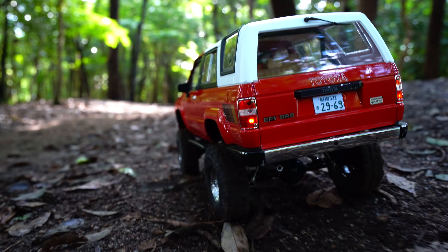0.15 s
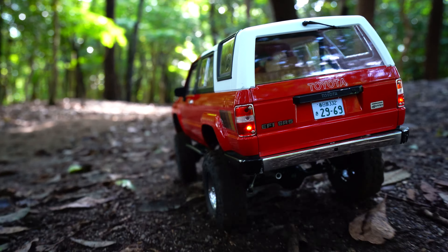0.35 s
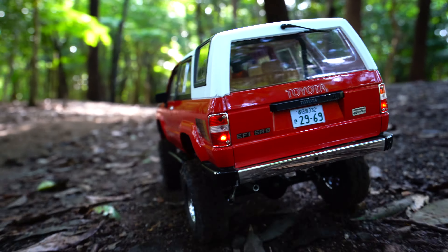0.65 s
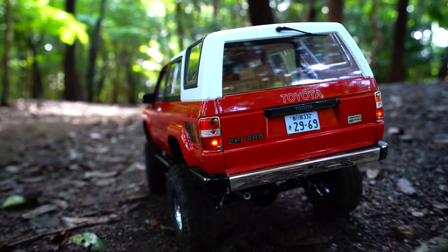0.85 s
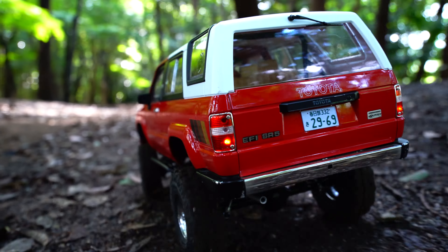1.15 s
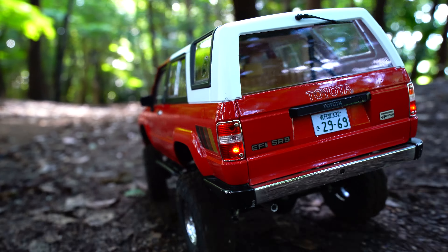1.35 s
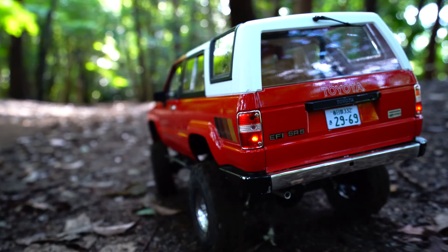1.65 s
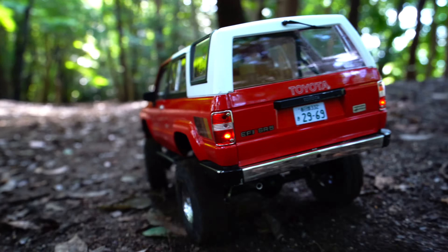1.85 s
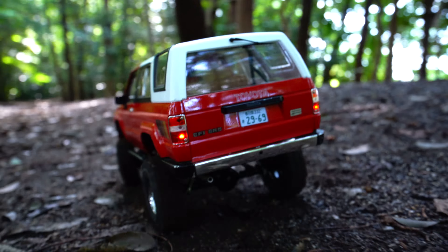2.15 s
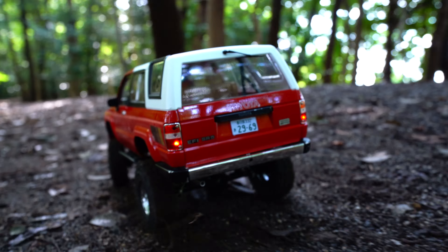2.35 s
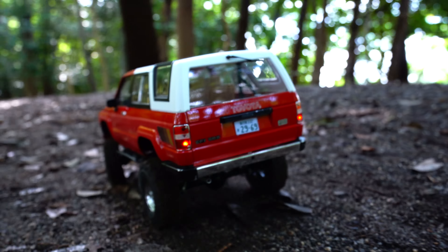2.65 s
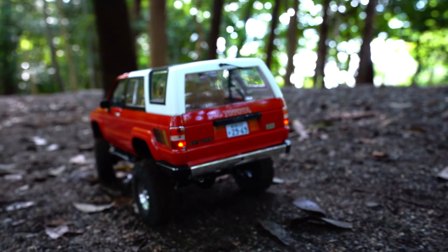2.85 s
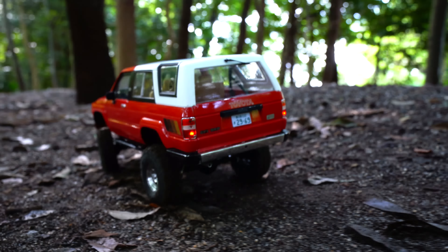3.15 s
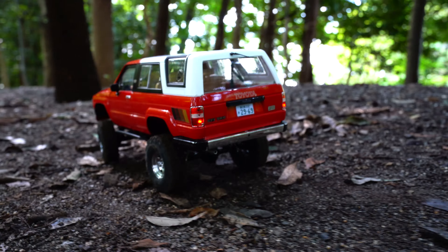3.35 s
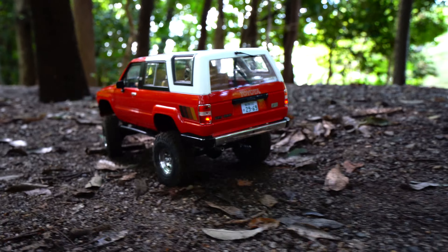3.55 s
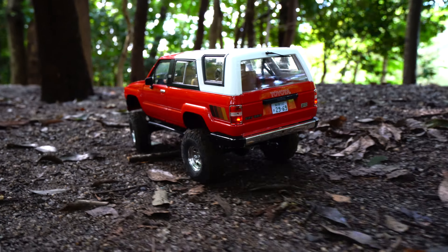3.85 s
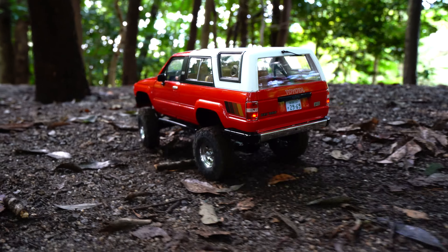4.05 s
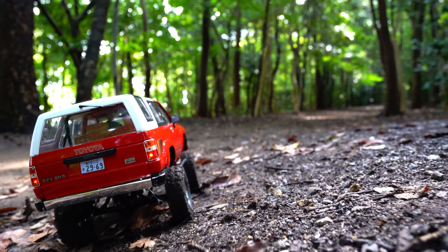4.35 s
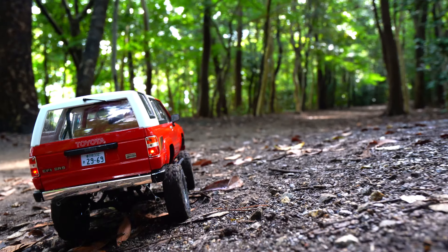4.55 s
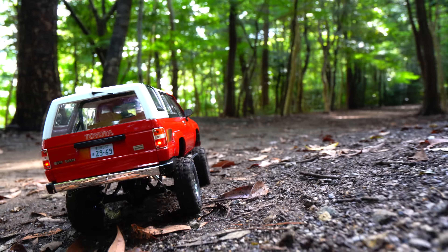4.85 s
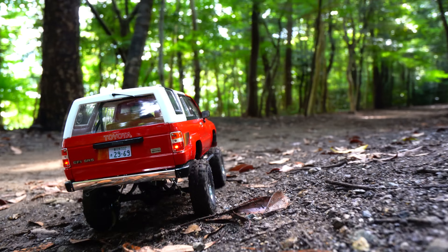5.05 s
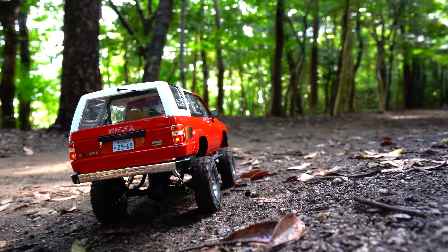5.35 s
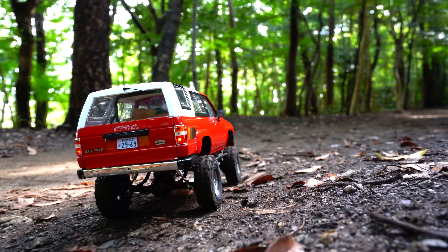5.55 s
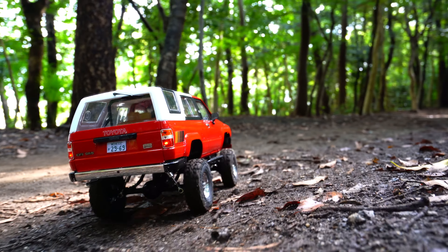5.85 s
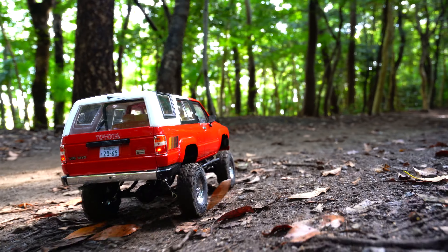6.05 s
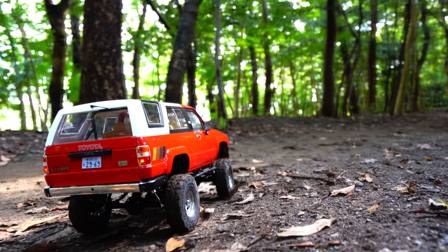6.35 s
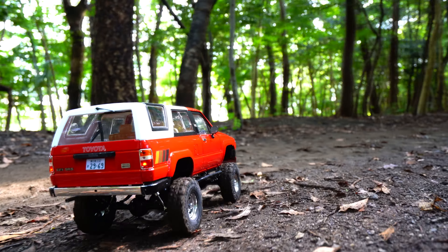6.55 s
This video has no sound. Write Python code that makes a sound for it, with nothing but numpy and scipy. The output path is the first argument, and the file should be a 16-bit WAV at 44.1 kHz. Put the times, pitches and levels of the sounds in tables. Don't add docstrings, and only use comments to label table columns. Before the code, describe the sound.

A radio-controlled model truck crawls across soil and leaf litter, its nasal motor whine wobbling, lurching and briefly dropping out. Soft tyres rumble and thump over roots; dull little knocks hit the body. A quick scene change makes the truck more distant, with renewed surges later. Bright, high insect noise dominates throughout, with occasional faint nearer insects, captured by one outdoor microphone, essentially mono.

```python
import sys
import numpy as np
from scipy import signal
from scipy.fft import rfft, irfft
from scipy.io import wavfile
from scipy.ndimage import uniform_filter1d

SR = 44100
rng = np.random.default_rng(int(sys.argv[2]) if len(sys.argv) > 2 else 0)


def elevation(decibels):
    levels = np.asarray(decibels, float)
    return 10 ** (levels / 20)


def store_wav(level_fs):
    pcm = np.round(np.clip(np.atleast_2d(level_fs), -1, 1) * 32767)
    wavfile.write(sys.argv[1], SR, pcm.T.astype(np.int16))


N = 295029
CUT_S = 4.287


def evened(x):
    return x / np.sqrt(np.mean(x ** 2) + 1e-20)


def columns(rows):
    s, *values = np.transpose(rows)
    return [np.interp(np.arange(N) / SR, s, v) for v in values]


def humps(s, length_s, height):
    out = np.zeros(N)
    for at_s, span_s, top in np.broadcast(s, length_s, height):
        first = max(round((at_s - span_s / 2) * SR), 0)
        last = min(round((at_s + span_s / 2) * SR), N)
        part = np.arange(first, last)
        out[part] += top * np.cos(np.pi * (part / SR - at_s) / span_s) ** 2
    return out


def drift(top_hz, count=N):
    return evened(signal.lfilter(*signal.butter(2, top_hz, fs=SR), rng.standard_normal(count)))


def noise(shape, patchy_db, size=512, tilt_db=np.zeros(N)):
    hop = size // 4
    hz = np.fft.rfftfreq(size, 1 / SR)
    shape_hz, shape_db = np.transpose(shape)
    real, imag, patches = rng.standard_normal((N // hop + 5, len(hz), 3)).T
    patches = uniform_filter1d(patches, size=6, axis=0)
    patches = evened(uniform_filter1d(patches, size=12, axis=1))
    colour_db = np.interp(np.log(hz + 1), np.log(shape_hz), shape_db, left=-90, right=-90)[:, None]
    frame_tilt_db = np.pad(tilt_db[::hop], (2, 5), "edge")[:real.shape[1]]
    tilt_db = np.outer(np.log2((hz + 1) / 8000), frame_tilt_db)
    z = (real + 1j * imag) * elevation(colour_db + tilt_db + patchy_db * patches)
    return evened(signal.istft(z, nperseg=size, noverlap=size - hop)[1][:N])


# frequency in Hz, level in dB.
SHELL = [(600, -32), (690, -38), (780, -42.5), (870, -40.5), (1100, -43.5), (1300, -43), (1450, -44),
         (1620, -39), (1850, -44.5), (2200, -46), (2480, -33), (2800, -47), (3550, -33), (5000, -45)]
# centre in seconds, length in seconds, second partial in dB, higher partials in dB.
BITES = [(0.2, .1, 0.5, 5), (0.417, 0.067, 8, 10), (0.75, 1, -1.5, -1), (1.354, 0.1, 0, 11),
         (1.487, 0.098, 5, 14), (1.667, .14, 1, 11.5), (1.973, 0.37, -1, -4), (2.287, 0.081, 0, 7.5),
         (2.591, 0.062, 4, 11), (2.718, 0.21, 1, -12), (2.853, 0.064, -3, 0), (3.308, 0.069, 8, 2.5),
         (3.6, .5, 0.5, -8), (3.848, 0.074, 5, -3), (4.044, .25, -5, -22), (4.45, .45, 2, 4),
         (4.8, .1, 6, -1), (5.046, 0.059, 0, 5), (5.099, 0.3, -5, 5), (5.292, .1, -1, 0),
         (5.361, .08, -2, 8), (5.499, 0.21, 3, 1), (5.7, .2, 0.5, 2), (5.923, 0.098, -3, 2),
         (6.12, .3, -9, 13), (6.452, 0.11, 3, 3), (6.578, 0.09, -2, 4)]


def motor():
    load_brightens, third_facing, third_offset_db = 0.37, 1.1, -3.5
    hz, effort_db, load_db, facing_db = drive()
    hz = hz * (1 + 0.01043 * drift(73.3) + 0.006 * drift(17.93))
    turns = np.cumsum(hz) / SR
    shaft = 2 * np.pi * turns / 14 + 1.2 * drift(20)

    s, length_s, bite_second_db, bite_upper_db = np.transpose(BITES)
    first_db = -facing_db / 2
    second_db = facing_db / 2 + load_brightens * load_db
    third_db = third_offset_db + third_facing * second_db + humps(s, length_s, bite_upper_db)
    second_db = second_db + humps(s, length_s, bite_second_db)
    levels_db = [first_db, second_db, third_db - 9.5, third_db - 15.5, third_db - 15.5, third_db - 9]
    throbs = [0.43, 0.14, 0.28, 0.2, 0.28, 0.27]

    shell_hz, shell_db = np.transpose(SHELL)
    shared_db = 1.32 * drift(26)
    out = np.zeros(N)
    for k, (db, throb) in enumerate(zip(levels_db, throbs), 1):
        db = db + effort_db + np.interp(np.log(k * hz), np.log(shell_hz), shell_db)
        beads = elevation(2.5 - (1.56 + 0.77 * k) * drift(20.5) ** 2)
        flutter = elevation(shared_db) * beads * (1 + throb * np.cos(shaft + k))
        smear = 0.27 * k * drift(48)
        out += elevation(db) * np.sqrt(2) * flutter * np.sin(2 * np.pi * k * turns + smear)
    return out


# time in seconds, whine in Hz, effort in dB, facing in dB (plus favours upper partials).
THROTTLE = [(0.0, 660, 0.5, 3), (0.085, 612, -9, 0.5), (0.35, 673.5, -7.5, -3), (0.9, 635.6, -6, -5),
            (1.2, 674, -8.5, 1.5), (1.675, 862, -0.5, -3.5), (1.9, 1111, 4, -5), (2.05, 1030, -2.5, -6),
            (2.35, 802.6, -4.5, 4.5), (2.7, 739, -3.5, 2.5), (3.2, 718, -5.5, 3), (3.7, 742, -9, -3.5),
            (4.29, 650.5, -10.5, -3), (4.9, 652.8, -11.5, -1), (5.35, 763, -7, -4), (5.9, 836.5, -2.5, -1),
            (6.25, 684, -11, -6), (6.69, 761, -7.5, -5)]
# centre in seconds, length in seconds, speed gain
# in percent, load in dB.
LURCHES = [(0.188, 0.16, 16.2, 6.5), (0.428, 0.13, 7.1, -1), (0.551, 0.2, 6.5, 0.5), (0.685, 0.15, 5.8, 0),
           (0.773, 0.11, 10.8, 5), (0.869, 0.061, 5.4, -4.5), (0.959, 0.13, 7.7, 3.5), (1.1, 0.2, 11.5, 3),
           (1.247, 0.12, 12.4, 4), (1.37, 0.24, 10.7, 2.5), (1.482, 0.11, 9, -1), (1.619, 0.09, 12, 4.5),
           (1.758, 0.12, 8.6, 2.5), (1.944, 0.11, 4.6, 0), (2.01, 0.11, 5.2, 5.5), (2.106, 0.11, 7.2, 0),
           (2.191, 0.17, 6.4, 2.5), (2.356, 0.12, 6.1, 1), (2.451, 0.14, 5.8, 1.5),
           (2.568, 0.19, 9.7, -0.5), (2.864, 0.11, 7.5, 8.5), (2.964, 0.15, 6.4, 2), (3.092, 0.13, 9.2, 2),
           (3.187, 0.18, 10.9, 1.0), (3.305, 0.11, 9.7, -2.5), (3.47, 0.2, 5.7, 7.5),
           (3.642, 0.12, 6.9, 2.5), (3.849, 0.14, 12.6, 4.5), (4.048, 0.2, 7.2, 8),
           (4.192, 0.15, 13.7, 6.5),
           (4.363, 0.13, 4.3, -2), (4.486, 0.06, 1.8, -2), (4.641, 0.2, 7.5, -1), (4.838, 0.13, 9.6, 6),
               (5.042, 0.2, 11.1, 5), (5.178, 0.09, 7.0, 5), (5.3, 0.1, 12.2, 4), (5.405, 0.2, 10.1, 5),
               (5.519, 0.2, 11.1, 1), (5.61, 0.13, 9.0, 2.5), (5.722, 0.16, 10.4, 3), (5.798, 0.11, 7.6, 2),
               (5.924, 0.2, 5.3, 2), (6.132, 0.2, 5.9, -3), (6.328, 0.2, 8.0, 4), (6.442, 0.2, 15.0, 6.5),
               (6.567, 0.13, 10.3, 5)]
# centre in seconds, level in dB.
SLACKS = [(0.015, -7.5), (0.155, -4), (0.225, 0), (0.375, -4), (0.445, 0), (0.63, -6), (0.765, -6),
          (0.875, 0.5), (0.94, -4), (1.025, -7), (1.12, -4), (1.46, -3), (1.594, -10), (1.736, -9),
          (1.88, -5), (2.875, -14), (3.02, -3), (3.235, -5), (3.335, -3), (3.46, -12), (4.155, -9),
          (4.24, -4), (4.6, 2), (4.835, -9), (4.965, 0), (5.875, -5), (6.0, -8), (6.11, -11), (6.34, -3),
          (6.535, -14)]


def drive():
    slack_s, base_effort_db = 0.082, 3
    hz, effort_db, facing_db = columns(THROTTLE)
    s, length_s, percent, lurch_db = np.transpose(np.array(LURCHES))
    load_db = humps(s, length_s, lurch_db)
    at_s, drop_db = np.transpose(SLACKS)
    slack_db = humps(at_s, slack_s, drop_db)
    hz = hz * np.exp(humps(s, length_s, percent) / 100)
    return hz, base_effort_db + effort_db + load_db + slack_db, load_db, facing_db


# frequency in Hz, density in dB per Hz.
GEARS = [(300, 4), (600, 3), (1000, 3.5), (1250, 1.5), (1650, 4.5), (2300, -0.5), (3000, -1.5),
         (4000, -0.5), (5500, 10.5)]


def gear_hiss():
    _, effort_db, _, _ = drive()
    s, length_s, _, bite_db = np.transpose(BITES)
    hiss_db = -43.5 + 0.06 * columns(NEARNESS)[0]
    hiss_db = hiss_db + 0.16 * effort_db + 0.1 * humps(s, length_s, bite_db)
    return elevation(hiss_db + 5.5 + 1.0 * drift(23)) * noise(GEARS, patchy_db=1.5, size=1024)


# frequency in Hz, density in dB per Hz.
TYRES = [(40, -19), (75, -5.5), (120, -5.5), (190, 4), (215, 0), (245, 2.5), (290, -2.5), (400, -6),
         (560, -13), (900, -24)]
FAR_TYRES = [(40, -39), (90, -8), (165, 1.5), (230, -5.5), (400, -6.5), (560, -15), (900, -39)]
# time in seconds, nearness in dB.
NEARNESS = [
    (0.0, -2),
    (1.1, 4),
    (1.6, 3.5),
    (2.6, 0),
    (3.5, -2),
    (4.28, -0.5),
    (4.29, -7.5),
    (5.5, -6),
    (6.69, -3),
]
# centre in seconds, length in seconds, level in dB.
ROOTS = [(0.0, .15, 4), (0.5, .2, 2), (0.9, 0.22, 0), (1.231, 0.23, 0.5), (1.436, 0.074, 2),
         (1.759, 0.13, 3.5), (1.945, .3, -1.5), (2.233, 0.11, 6), (2.396, 0.15, 1), (2.63, 0.074, 2),
         (2.847, .2, 1), (3.801, .08, -8), (3.87, 0.091, 1), (4.15, 0.36, 2.5), (4.8, .1, 7.5),
         (5.28, 0.16, 5.5), (5.789, .12, 4.5), (5.88, 0.097, -4), (6.279, 0.21, -1), (6.62, .15, 1)]


def tyres():
    _, _, load_db, _ = drive()
    rumble_db = -41.5 + columns(NEARNESS)[0] - 0.06 * load_db + humps(*np.transpose(ROOTS))
    near = noise(TYRES, patchy_db=1.5, size=2048)
    far = noise(FAR_TYRES, patchy_db=2.0, size=2048)
    return elevation(rumble_db + 1.1 * drift(24)) * np.where(np.arange(N) < CUT_S * SR, near, far)


# start in seconds, peak in dB, ring in Hz, t60 in seconds.
KNOCKS = [
    (0.193, -33, 248, 0.075),
    (1.424, -37, 154.5, 0.029),
    (2.238, -28.5, 163.3, 0.029),
    (2.262, -33, 206, 0.03),
    (5.282, -27, 173.6, 0.028),
    (5.743, -22, 448, 0.015),
    (5.757, -35, 405, 0.042),
    (5.787, -30, 423, 0.023),
]


def knocks():
    out, t = np.zeros(N), np.arange(4000) / SR
    modes = [(.6, 0.25), (1, 0.97), (1.5, 0.66), (2.1, 0.36)]
    for s, db, hz, t60_s in KNOCKS:
        ring = sum(share * np.sin(2 * np.pi * ratio * hz * t) for ratio, share in modes)
        push = 1 - np.exp(-t * hz * 3)
        at = round(s * SR)
        out[at:at + len(t)] += elevation(db + 6.5 - 60 * t / t60_s) * ring * push
    return out


# start in seconds, end in seconds, pulse rate in Hz at start,
# pulse rate in Hz at end, level in dB, lowest multiple heard.
SOLOS = [
    (1.8, 2.02, 420.2, 420.4, -50, 10),
    (3.47, 3.78, 426.8, 427.5, -52, 10),
    (4.4, 4.75, 408, 410, -57, 10),
    (5.3, 5.95, 385, 406, -54, 10),
    (6.47, 6.75, 365, 366.5, -51, 12),
]


def solos():
    out = np.zeros(N)
    for start_s, end_s, from_hz, to_hz, db, lowest in SOLOS:
        part = slice(round(start_s * SR), round(end_s * SR))
        count = len(out[part])
        hz = np.linspace(from_hz, to_hz, count) * (1 + 0.00049 * drift(7.2, count))
        turns = np.cumsum(hz) / SR
        multiples = lowest + np.arange(3 if start_s > 5 else 1)
        lines = sum(elevation(1.3 * drift(12.0, count)) * np.cos(2 * np.pi * k * turns) for k in multiples)
        out[part] = elevation(db) * np.sqrt(2) * signal.windows.tukey(count, .3) * lines
    return out


# time in seconds, swell of the chorus in dB,
# share of the lower choir in dB, tilt in dB per octave.
CHORUS = [(0.0, 0.1, -4.5, -0.3), (0.5, 0.6, -2, -1), (1.15, 1.0, -1, -1.5), (1.3, 0.2, -1.5, -2.5),
          (1.8, -0.4, 2, -2), (2.9, 0.74, 2, 0.5), (3.4, -0.55, 0.8, 0), (4.2, 0.5, 1.1, 1),
          (4.4, -0.7, 2.8, 0.6), (5.2, 0, 1.2, 1.3), (5.9, -0.4, 1.7, 2), (6.69, 0.4, -2.5, 2)]
# frequency in Hz, density in dB per Hz.
HIGH_CHOIR = [(5500, -25.5), (6500, -12.5), (7300, -7), (8150, -5), (8900, -7.5), (9800, -18),
              (11200, -31.5), (13000, -35), (15700, -41.5)]
LOW_CHOIR = [(3000, -27), (3600, -14.5), (4900, -17.5), (5200, -7.5), (5600, 2.5), (6200, 5.5), (6900, 0.5),
             (7800, -21)]


def cicadas():
    swell_db, share_db, tilt_db = columns(CHORUS)
    tilt_db = -1.4 + tilt_db + 0.8 * drift(1.5)
    high_db = -20 + swell_db + 0.1 * drift(42)
    low_db = -29.5 + swell_db + share_db + 0.17 * drift(20)
    high = elevation(high_db) * noise(HIGH_CHOIR, patchy_db=0.12, size=1024, tilt_db=tilt_db)
    return high + elevation(low_db) * noise(LOW_CHOIR, patchy_db=2.0, size=4096)


# frequency in Hz, density in dB per Hz.
AIR = [(15, 3), (28, -2), (50, -8), (90, -7), (200, -33)]


def air():
    return elevation(-55.5) * noise(AIR, patchy_db=3.0, size=4096)


def scene():
    mono = motor() + gear_hiss() + tyres() + knocks() + solos() + cicadas() + air()
    return np.tile(mono, (2, 1))


def top_cut(x):
    return signal.sosfilt(signal.butter(12, 15830, fs=SR, output="sos"), x)


# centre in seconds, level in dB, low edge in Hz, high edge in Hz.
SPLITS = [
    (1.19, -21, 7500, 11200),
    (1.19, -44, 4200, 5300),
    (1.19, -52, 13000, 14500),
    (2.722, -32, 9000, 11800),
    (4.903, -24, 7500, 9800),
    (4.903, -44, 4200, 5300),
    (5.486, -38, 9600, 11200),
    (5.81, -46, 10400, 15800),
]


def record(dry):
    fade_s, size = .006, 1764
    fade = np.clip(abs(np.arange(N) / SR - CUT_S) / fade_s, 0, 1)
    side = np.zeros(N)
    hz = np.fft.rfftfreq(size, 1 / SR)
    for s, db, low_hz, high_hz in SPLITS:
        part = slice(round(s * SR) - size // 2, round(s * SR) + size // 2)
        colour = uniform_filter1d(abs(rfft(dry[0, part] * np.hanning(size))), size=9)
        spectrum = rfft(rng.standard_normal(size)) * colour
        band = irfft(spectrum * (hz > low_hz) * (hz < high_hz))
        side[part] += elevation(db) * evened(band) * np.hanning(size)
    return top_cut(dry * fade + side * np.array([[1], [-1]]))


dry = scene()
out = record(dry)
store_wav(out)
```